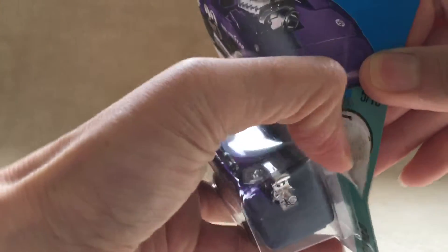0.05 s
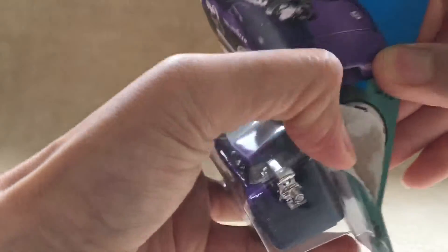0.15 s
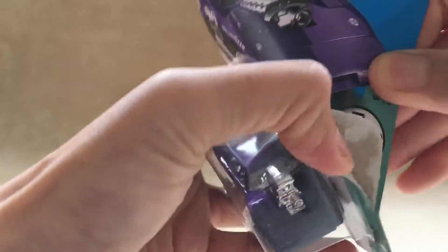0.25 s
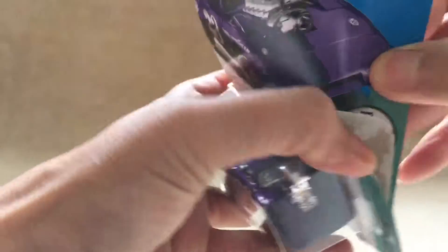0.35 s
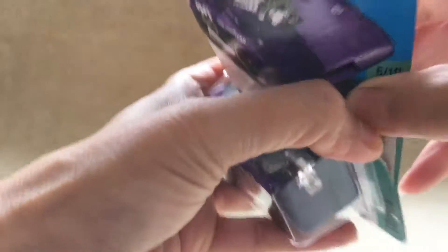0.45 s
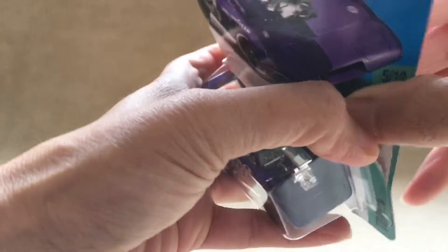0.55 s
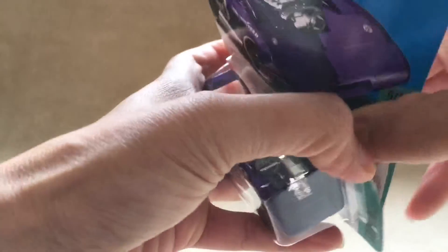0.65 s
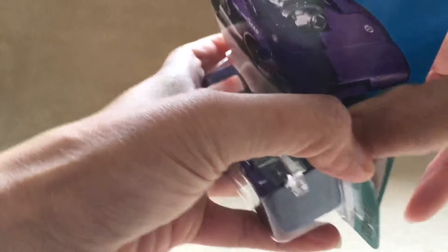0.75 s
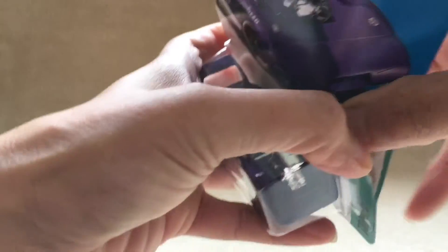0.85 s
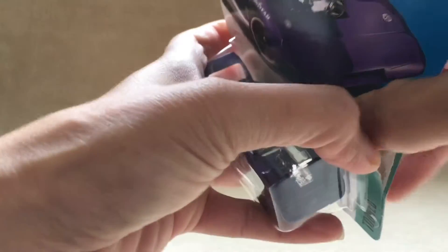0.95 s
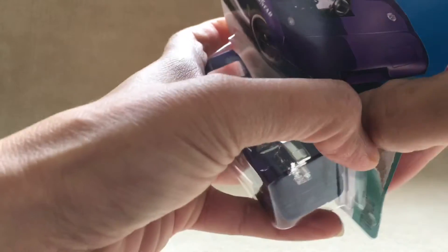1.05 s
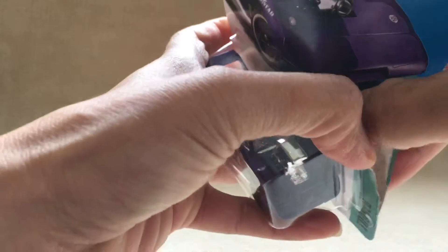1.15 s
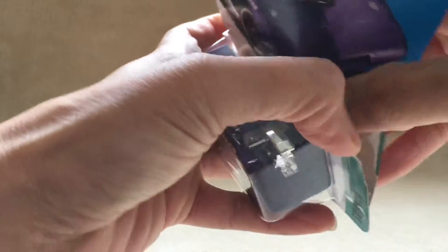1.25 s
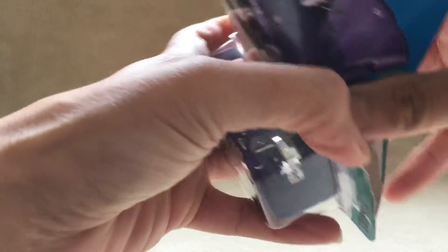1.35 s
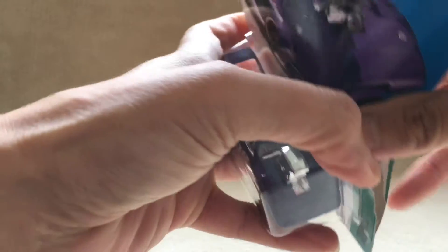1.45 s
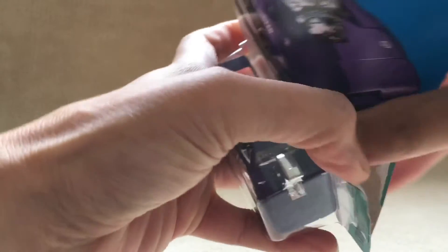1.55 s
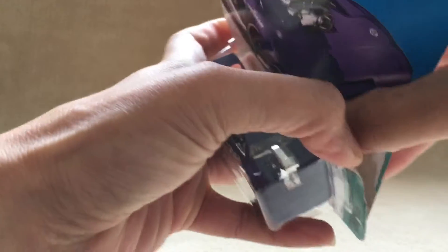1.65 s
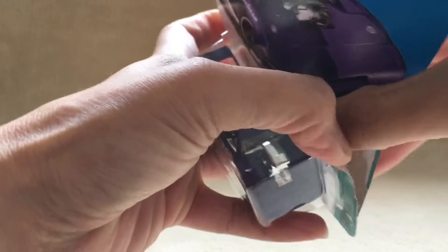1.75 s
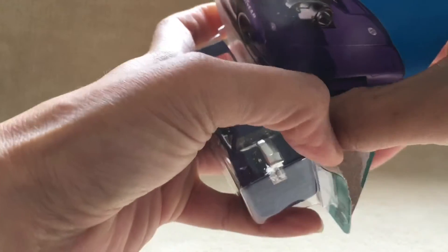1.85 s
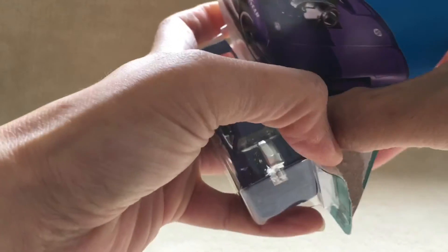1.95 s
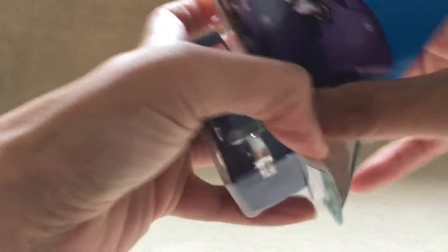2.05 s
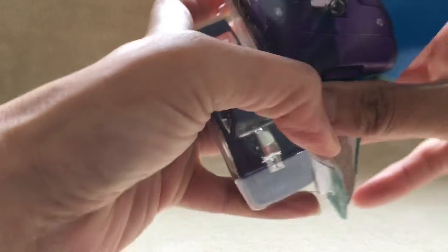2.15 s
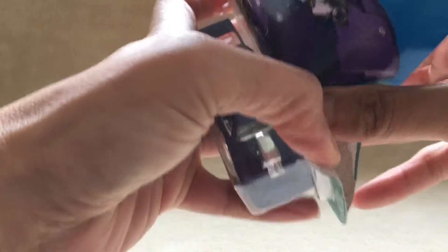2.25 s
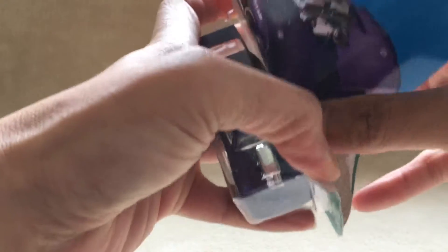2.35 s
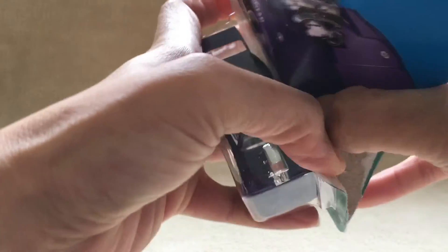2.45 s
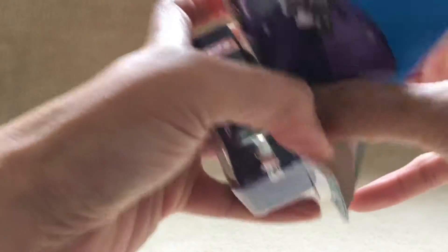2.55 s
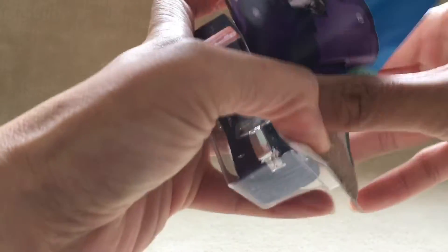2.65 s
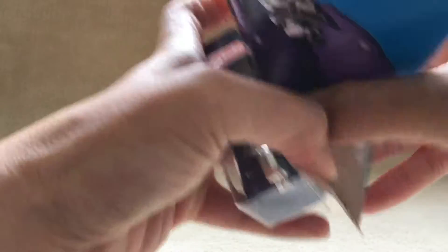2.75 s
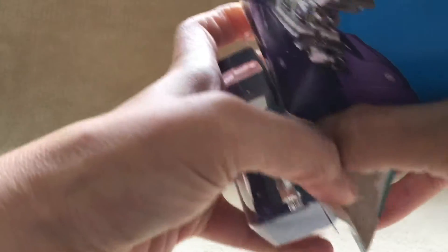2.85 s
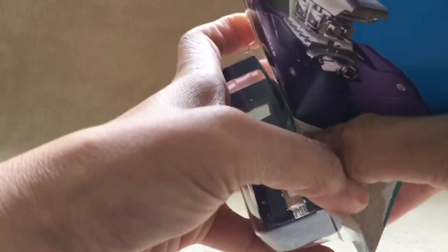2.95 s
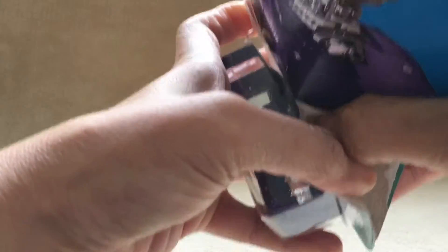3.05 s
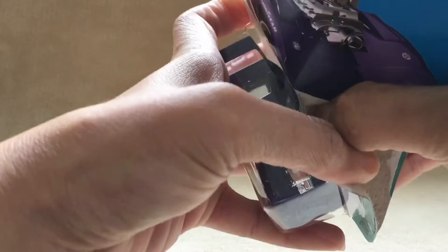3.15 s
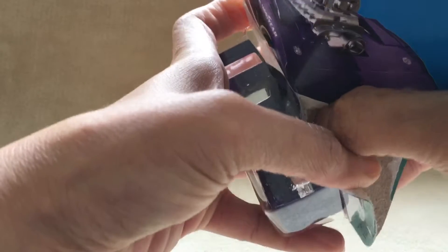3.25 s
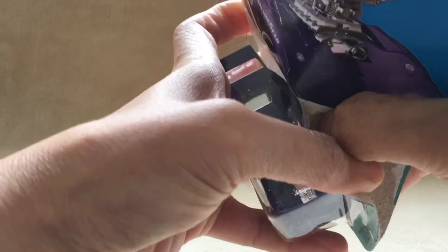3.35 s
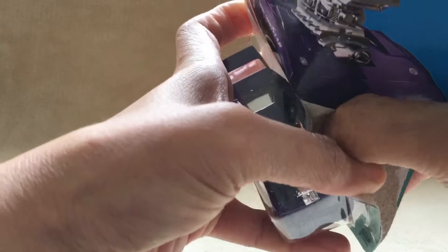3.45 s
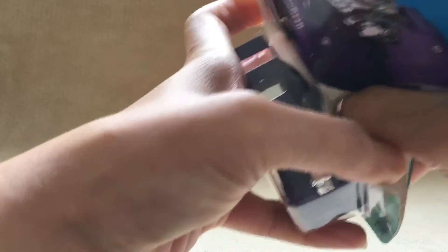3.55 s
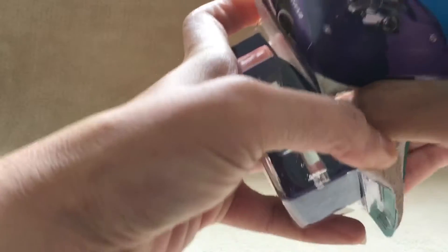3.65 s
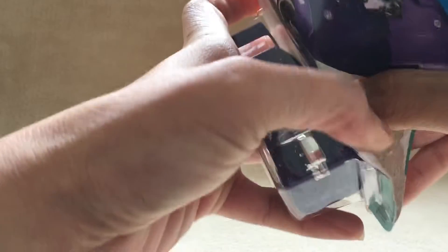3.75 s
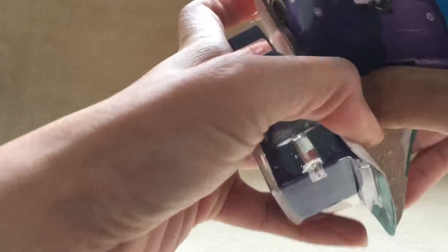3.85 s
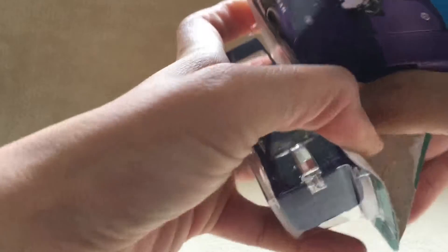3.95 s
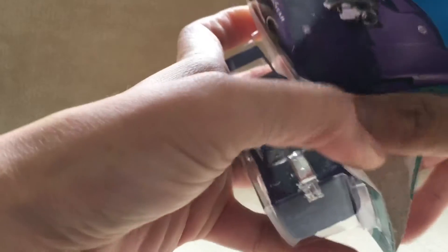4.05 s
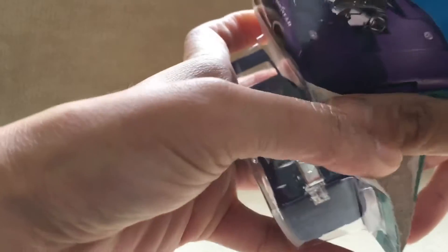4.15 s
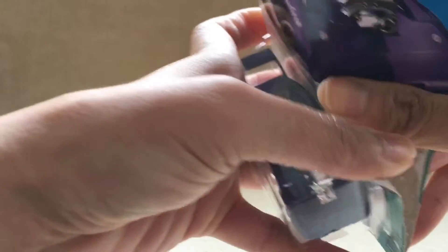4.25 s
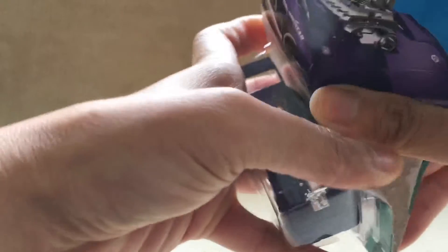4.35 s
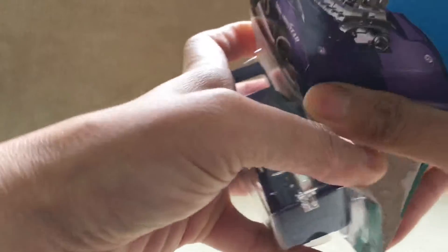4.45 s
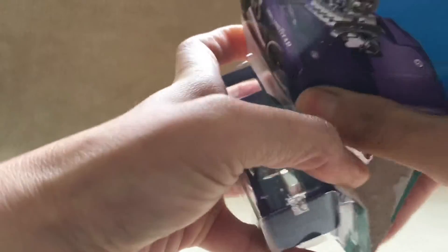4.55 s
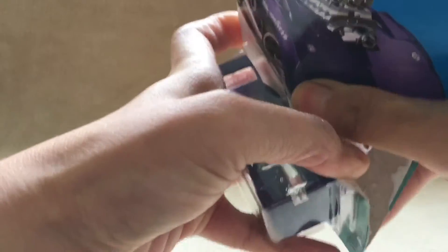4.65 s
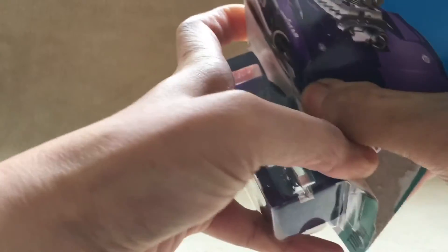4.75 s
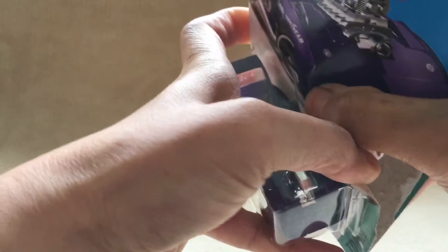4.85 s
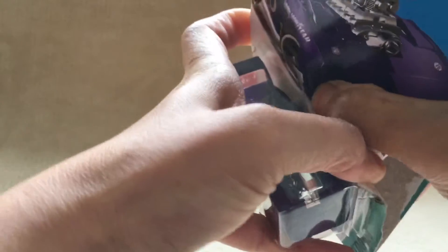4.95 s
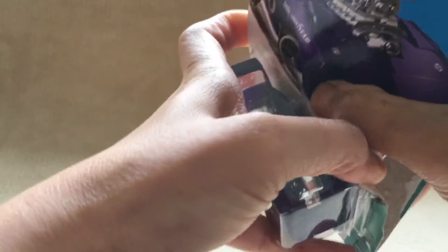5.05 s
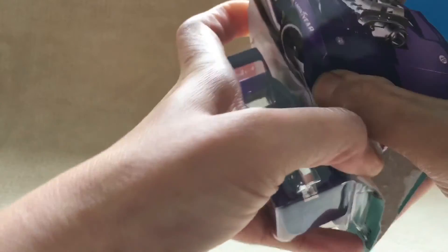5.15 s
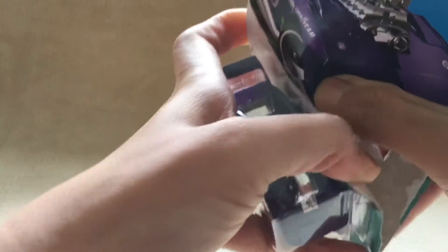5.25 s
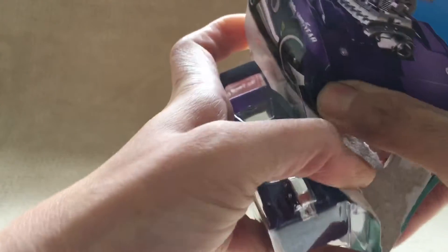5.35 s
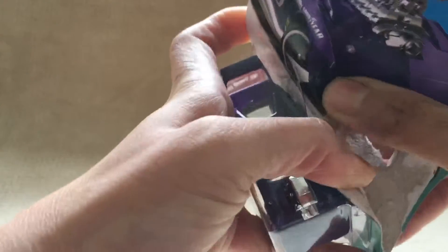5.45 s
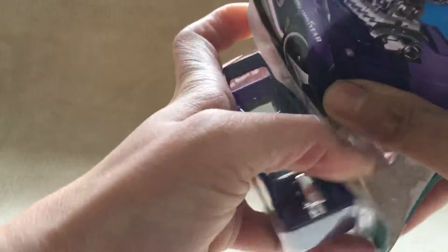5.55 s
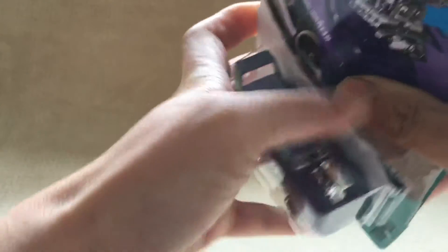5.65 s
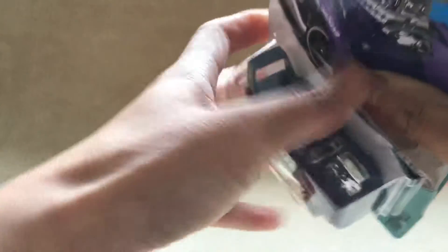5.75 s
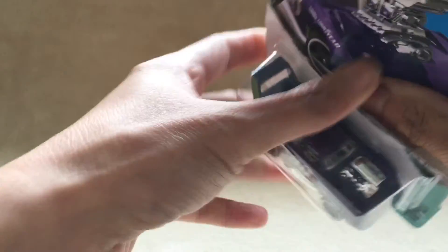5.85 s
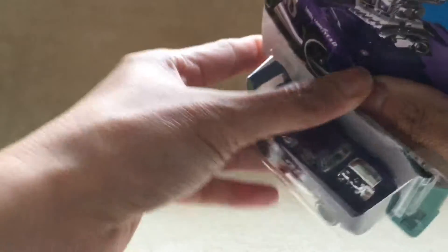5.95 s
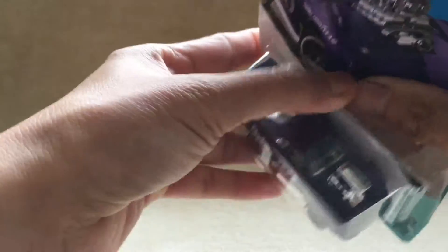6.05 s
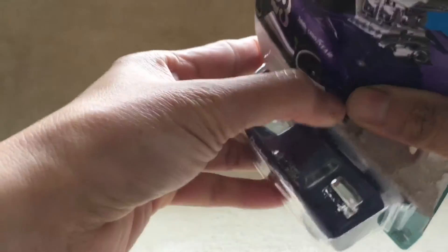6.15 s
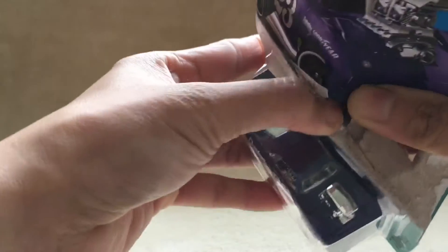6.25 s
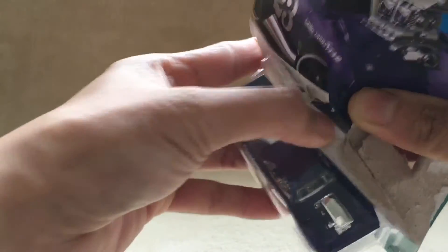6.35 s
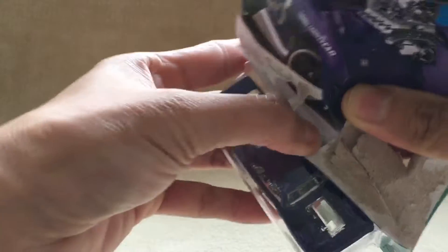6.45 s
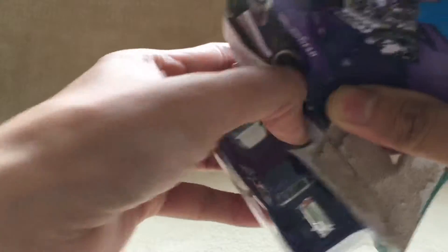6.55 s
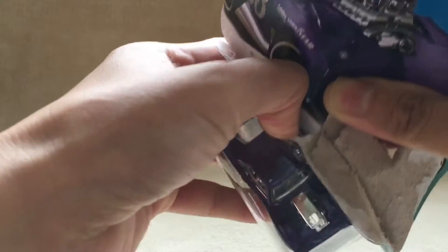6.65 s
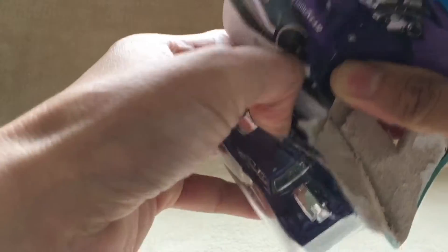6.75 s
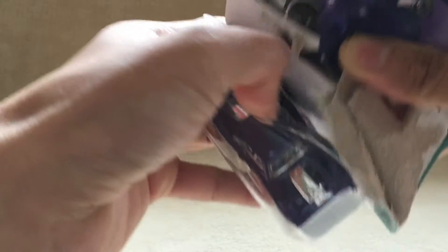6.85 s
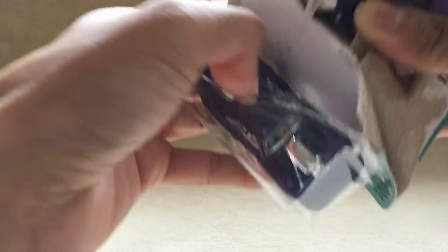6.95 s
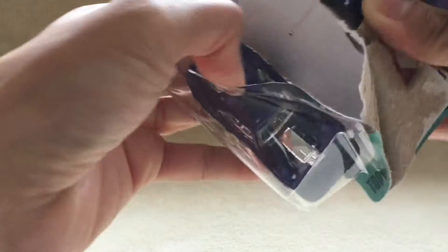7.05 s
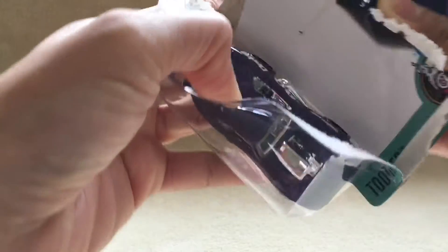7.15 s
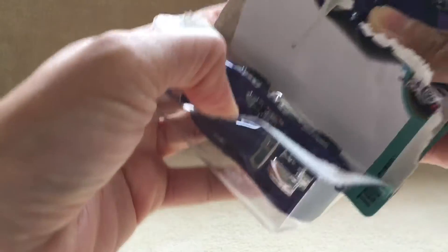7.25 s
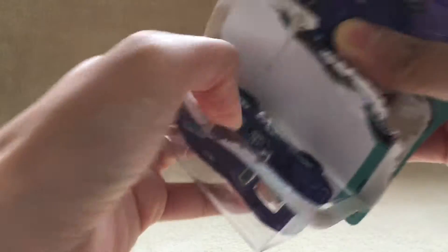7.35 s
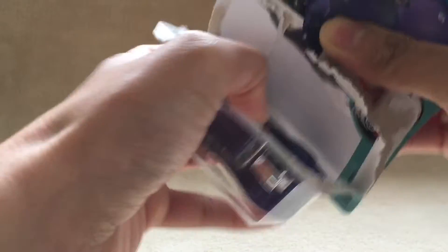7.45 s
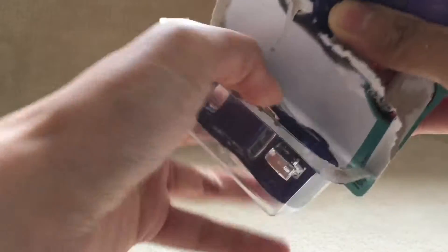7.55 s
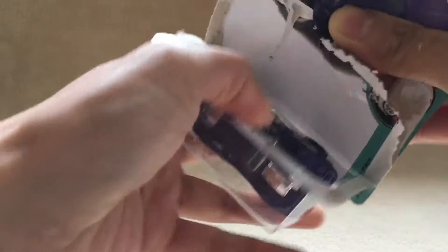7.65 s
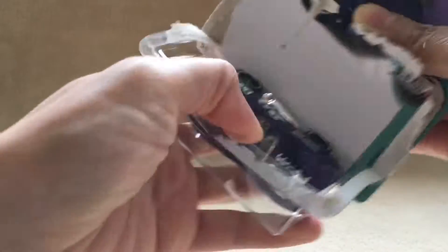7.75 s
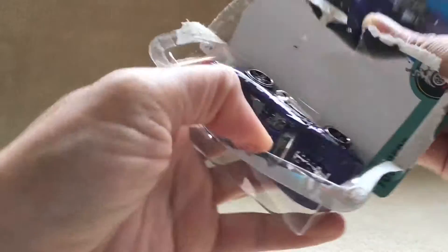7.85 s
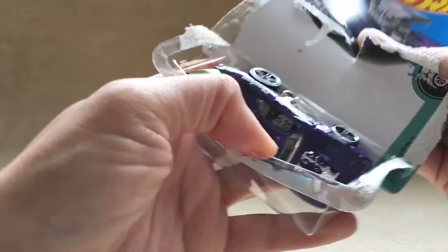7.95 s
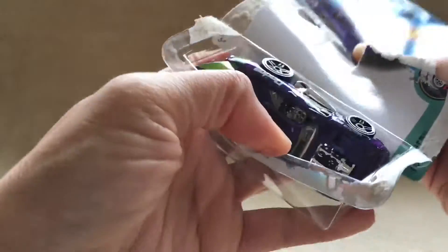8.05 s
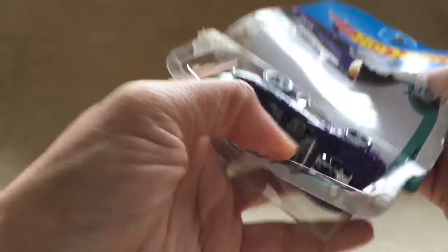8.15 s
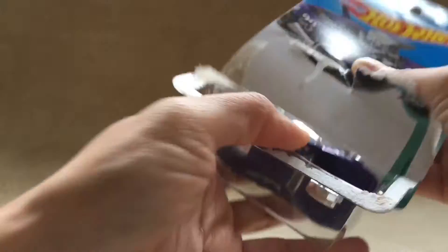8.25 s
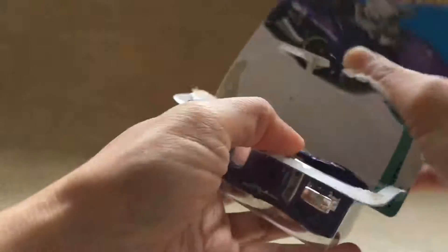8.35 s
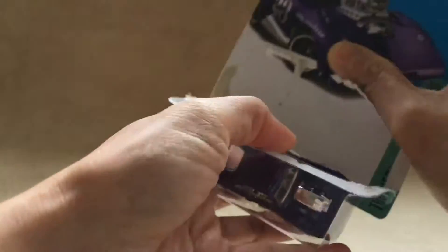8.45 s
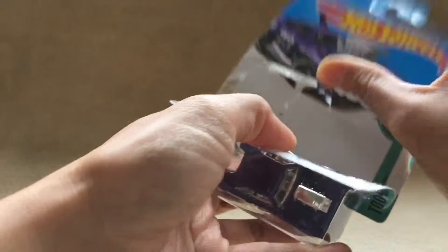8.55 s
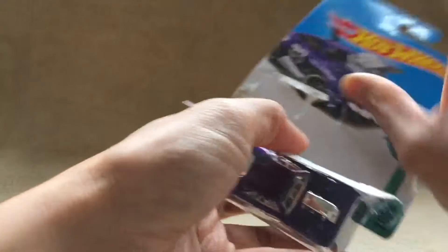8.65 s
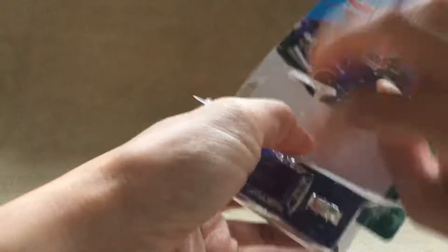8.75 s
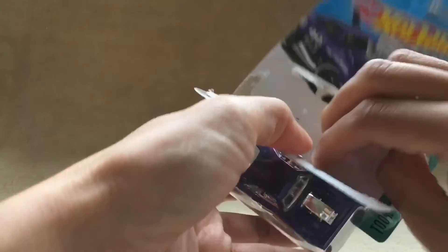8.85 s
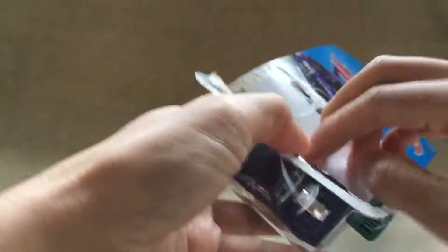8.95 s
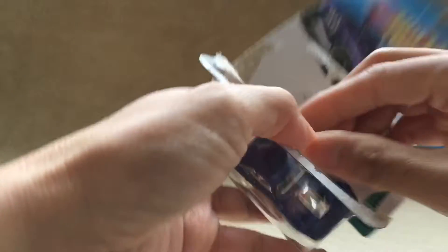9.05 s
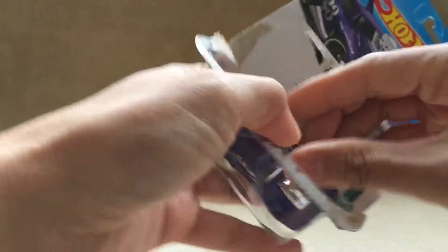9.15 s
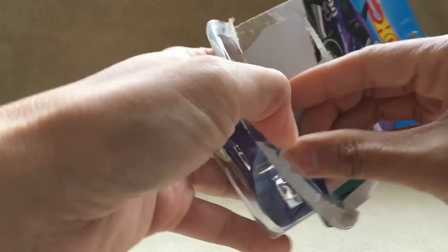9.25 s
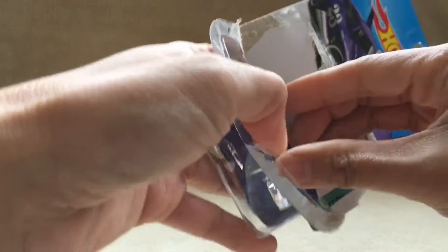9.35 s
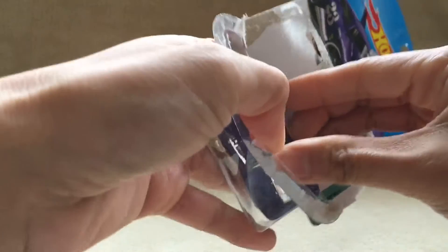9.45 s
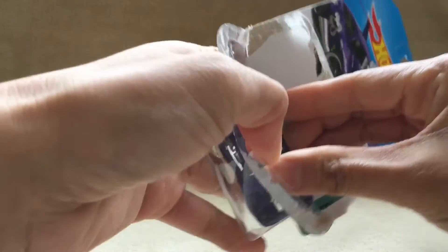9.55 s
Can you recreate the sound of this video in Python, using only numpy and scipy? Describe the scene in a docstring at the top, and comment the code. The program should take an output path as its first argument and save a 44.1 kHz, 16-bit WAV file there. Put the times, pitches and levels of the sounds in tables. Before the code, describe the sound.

Close, dry plastic packaging crackles and pops in uneven tugs, building to loud snaps and ripping card, then easing into lighter crinkles.

```python
"""Indoors, close to a small microphone: two hands peel a clear plastic blister off its cardboard backing.
Glued card tears in a crackle: clumped noise grains over a rasp. The stiff shell buckles in sharp snaps:
uneven slips driving dying sines. Narrow resonances tremble and the hollow shell answers the tearing.
The flapping card pushes air in short low pulses; faint echoes and a low room rumble lie beneath."""
import sys
import numpy as np
from scipy import signal
from scipy.io import wavfile
from scipy.ndimage import uniform_filter1d

SR = 44100
rng = np.random.default_rng(int(sys.argv[2]) if len(sys.argv) > 2 else 0)


def inscribe(sig):
    """Save sig as 16-bit PCM at rate SR to the path in sys.argv[1].

    A 1-D sig is mono; a 2-D sig holds one channel per row.
    Samples are clipped to [-1, 1] before scaling.
    """
    pcm = np.round(np.clip(np.atleast_2d(sig).T, -1, 1) * 32767)
    wavfile.write(sys.argv[1], SR, pcm.astype(np.int16))


N = 423360
TIME_S = np.arange(N) / SR

# shell modes: pitch_factor, relative_db, cycles_to_minus_60_db
SHELL_MODES = [(.56, -11, 18), (.8, -9, 18), (1.0, 0, 27), (1.24, -3, 26), (1.55, -9, 20), (2.1, -13, 20)]
# treble colour of cracks and fibres: freq_hz, relative_db
CRACK_COLOUR = [(2200, -30), (3200, -0.5), (4100, 0.5), (5000, 0), (6200, 0), (8500, -3.5), (10500, -7),
                (12700, -5), (15600, -11)]
# colour of shell and card body: freq_hz, relative_db
BODY_COLOUR = [(120, -5.5), (300, -5.5), (650, 0), (1200, 1), (1800, 4.5), (2400, 3.5), (3300, 0),
               (6000, -17)]
# pulls of the hand, each tearing a strip of glue:
# start_s, length_s, crackle_start_db, crackle_end_db, body_above_crackle_db
PULLS_OF_HAND = [(0.004, 0.2, -55.5, -37, -7.5), (0.402, 0.012, -48, -85, 5.5),
                 (0.445, 0.1, -52.5, -48, 2.5), (0.639, 0.24, -50, -57.5, 3.5),
                 (0.96, 0.35, -48.5, -53, -2.5), (1.164, 0.017, -36, -38.5, -5),
                 (1.356, 0.11, -41, -54.5, 2), (1.569, 0.12, -54, -56, 7.5),
                 (1.685, 0.068, -41.5, -53.5, 1.5), (1.833, 0.19, -46.5, -50.5, -9.5),
                 (1.939, 0.11, -46.5, -43.5, -8.5), (2.142, 0.06, -41, -54.5, 0),
                 (2.226, 0.15, -61, -59.5, 0), (2.496, 0.017, -52, -52.5, 8.5),
                 (2.635, 0.069, -46.5, -42, 0), (2.828, 0.1, -52, -70, 3), (2.956, 0.1, -50, -70, 1.5),
                 (3.096, 0.15, -53, -56.5, -0.5), (3.27, 0.04, -65, -51, 3), (3.408, 0.18, -53, -51, -3),
                 (3.62, 0.027, -30, -58, 4), (3.722, 0.079, -50.5, -54, 8.5), (3.941, 0.12, -53, -44, 4),
                 (4.115, 0.035, -46.5, -45.5, 7.5), (4.319, 0.059, -41, -62, -1),
                 (4.452, 0.028, -50, -54, 7), (4.543, 0.038, -47, -41.5, -1.5),
                 (4.681, 0.14, -55.5, -52, 0), (4.86, 0.083, -59, -60.5, -2),
                 (4.978, 0.033, -40.5, -39.5, -1.5), (5.108, 0.23, -59.5, -55.5, 0),
                 (5.402, 0.11, -51, -51, -4), (5.637, 0.061, -49.5, -44.5, 7), (5.81, 0.25, -61, -67, 8),
                 (5.861, 0.1, -56, -52.5, 9), (6.064, 0.11, -59.5, -57.5, 5), (6.22, 0.14, -54, -52, -3.5),
                 (6.478, 0.0049, -30.5, -41, 1), (6.562, 0.13, -69.5, -57, 3), (6.698, 0.24, -45, -36.5, 0),
                 (6.872, 0.15, -41.5, -39.5, -3), (7.087, 0.12, -51, -38.5, -1),
                 (7.272, 0.19, -72.5, -59, 6), (7.493, 0.17, -48.5, -67, 8.5),
                 (7.79, 0.19, -49, -51.5, 3.5), (8.051, 0.33, -41, -64, -5), (8.37, 0.25, -61, -58, 2.5),
                 (8.658, 0.097, -59.5, -60.5, 0.5), (8.822, 0.15, -40.5, -48.5, -3),
                 (9.063, 0.053, -55, -63, 10), (9.13, 0.03, -44, -49.5, 2.5),
                 (9.252, 0.064, -57.5, -63.5, 13), (9.461, 0.056, -57, -60, -1),
                 (9.576, 0.05, -64, -61, 4.5)]


def gain_of(db):
    """Decibels to an amplitude factor."""
    return 10 ** (np.asarray(db) / 20)


def evened(x):
    """Scales to rms 1."""
    return x / np.sqrt(np.mean(x ** 2) + 1e-20)


def read_spectrum(points, hz):
    """Interpolates a spectrum table on a log-frequency axis."""
    f, value = np.transpose(points)
    return np.interp(np.log(hz + 1), np.log(f + 1), value)


def over_time(points):
    """Interpolates a (time, value) table at every sample."""
    return np.interp(TIME_S, *np.transpose(points))


def add(mix, start_s, sound):
    """Mixes a sound in at a time, cut at the end of the mix."""
    part = mix[round(start_s * SR):][:len(sound)]
    part += sound[:len(part)]


def minimum_phase(colour, size=4096):
    """Minimum-phase impulse response of a colour, floored at -100 dB."""
    hz = abs(np.fft.fftfreq(size, 1 / SR))
    log_gain = np.log(gain_of(np.maximum(read_spectrum(colour, hz), -100)))
    return np.fft.ifft(np.exp(np.conj(signal.hilbert(log_gain)))).real[:size // 2]


def ringing(modes, detune, size=3000):
    """Sum of dying sines, each pitch scaled by its detune factor; modes: hz, db, t60_s."""
    t = np.arange(size) / SR
    return sum(gain_of(db - 60 * t / t60_s) * np.sin(2 * np.pi * hz * factor * t)
               for (hz, db, t60_s), factor in zip(modes, detune))


def shell_modes_at(shell_hz):
    """Shell modes at one pitch; each dies over a set count of cycles."""
    return [(shell_hz * k, db, cycles / (shell_hz * k)) for k, db, cycles in SHELL_MODES]


def burst(x, db):
    """Sets the energy to that of 10 ms of sound at this rms level."""
    return gain_of(db) * x * np.sqrt(SR / 100 / np.sum(x ** 2))


def rumble(level_db=-57, patchy_db=2.4):
    """Room noise, strongest in the bass, its spectrum swelling and sinking in patches."""
    # freq_hz, relative_density_db
    density = [(22, -34), (40, -4.5), (60, 8), (80, -13.5), (120, -4.5), (190, -13), (340, -12),
               (800, -29.5), (2000, -44.5), (16000, -37.5)]
    frames, hz = N // 512 + 5, np.fft.rfftfreq(2048, 1 / SR)
    real, imag, patches = rng.standard_normal((frames, 1025, 3)).T
    patches = evened(uniform_filter1d(uniform_filter1d(patches, 4, 0), 8, 1))
    z = (real + 1j * imag) * gain_of(read_spectrum(density, hz)[:, None] + patchy_db * patches)
    noise = signal.istft(z, nperseg=2048, noverlap=1536)[1][:N]
    return gain_of(level_db) * evened(noise)


def tearing(grains, median_per_s, spread_db, rasp_gain, clump_db):
    """Grains come in clumps, a few large, each with its own colour, over a rasp that swells with the clumps."""
    # separate crackles against smooth scrape: time_s, crackle_share_0_to_1 (before rasp_gain)
    crackle_share = [(1.7, .4), (1.8, .9), (3.5, .85), (3.9, .15), (4.3, .2), (4.6, .85), (5.2, .8),
                     (5.6, .3), (6.3, .8), (7.9, .7), (8.05, .3)]
    slow = uniform_filter1d(uniform_filter1d(rng.standard_normal(N), 400), 250)
    clumps = gain_of(clump_db * evened(slow))
    struck = rng.random(N) < clumps * median_per_s / SR
    size = gain_of(spread_db * np.minimum(rng.exponential(1, N), 3.5)) * struck
    which = rng.integers(0, len(grains), N)
    breaks = sum(signal.oaconvolve(size * (which == k), evened(grain))[:N] for k, grain in enumerate(grains))
    rasp = rasp_gain * evened(clumps * rng.standard_normal(N))
    share = over_time(crackle_share)
    mixed = np.sqrt(share) * evened(breaks) + np.sqrt(1 - share) * rasp
    return mixed / np.sqrt(share + (1 - share) * rasp_gain ** 2)


def drifting(x, patchy_db):
    """Colour wanders as the tear moves over card and shell: bands swell for about a tenth of a second."""
    z = signal.stft(x, nperseg=256)[2]
    patches = uniform_filter1d(rng.standard_normal(z.shape[::-1]).T, 6, 0)
    patches = evened(uniform_filter1d(uniform_filter1d(patches, 30, 1), 20, 1))
    return signal.istft(z * gain_of(patchy_db * patches), nperseg=256)[1][:N]


def pulling(above_db, fall_db_per_s, rise_db_per_s=395):
    """Gain of all pulls: each rises, slides from first to last level, falls; energies add."""
    start_s, length_s, first_db, last_db = np.transpose(PULLS_OF_HAND)[:4, :, None]
    t = np.arange(0, N / SR, .002)
    progress = np.clip((t - start_s) / length_s, 0, 1)
    held_db = first_db + (last_db - first_db) * progress + above_db
    before_s, after_s = np.maximum(start_s - t, 0), np.maximum(t - start_s - length_s, 0)
    db = held_db - rise_db_per_s * before_s - fall_db_per_s * after_s
    return np.interp(TIME_S, t, np.sqrt(np.sum(gain_of(db) ** 2, axis=0)))


def peel():
    """Fibres crackle in the treble; small folds of the shell click and ring through shell and card."""
    fibres = rng.standard_normal((12, 120)) * np.exp(-np.arange(120) / 20.0)  # dying noise bursts
    folds = [ringing(shell_modes_at(hz), rng.uniform(0.773, 1.145, len(SHELL_MODES)))
             for hz in np.geomspace(450, 2400, 14)]
    tear = tearing(fibres, median_per_s=600, spread_db=4.5, rasp_gain=1.3, clump_db=2.8)
    tear = drifting(tear, patchy_db=2.0)
    creak = tearing(folds, median_per_s=220, spread_db=4., rasp_gain=2.6, clump_db=3.)
    creak = drifting(creak, patchy_db=2.4)
    crackle = evened(signal.oaconvolve(tear, minimum_phase(CRACK_COLOUR))[:N])
    body = evened(signal.oaconvolve(0.51 * tear + creak, minimum_phase(BODY_COLOUR))[:N])
    body_above_db = np.transpose(PULLS_OF_HAND)[4, :, None]
    low = pulling(body_above_db, fall_db_per_s=231) * body
    treble = pulling(0, fall_db_per_s=290) * crackle
    return low, treble


def turned(treble, split_hz=10200):
    """The top treble comes and goes, perhaps as the flat sheet turns in the hands."""
    # time_s, top_treble_gain_db
    brightness = [(0.15, 5.5), (0.38, -5), (0.94, 8), (1.11, 2), (2.74, -0.5), (3.37, 14.5), (3.69, -10),
                  (4.84, 2), (5.03, -2), (6.07, -10), (6.282, 7), (6.57, -5), (6.81, 7.5), (7.582, -5.5),
                  (8.04, 6.5), (8.34, -1.5), (9.32, -6.5), (9.59, -0.5)]
    top = signal.oaconvolve(treble, signal.firwin(63, split_hz, pass_zero=False, fs=SR), "same")
    return treble - top + top * gain_of(over_time(brightness))


def hollow(torn):
    """The space between shell and card answers tearing at its resonances, more or less as the gap changes."""
    # resonances of the half-open shell: freq_hz, width_hz
    resonances = [(1200, 290), (3950, 320)]
    # gain of each resonance: time_s, low_db, high_db
    gains = [(0.0, 5, -8), (1.2, -30, -16), (2.0, -2, 7), (2.6, -5, 1), (3.1, 0, 8.5), (3.8, -35, -11),
             (4.4, 4, -4), (5.0, -12, 5), (5.4, 13, -1), (5.9, -3.5, -12), (6.7, 3, -25.5), (7.3, -8.5, -5),
             (7.9, -13, 0), (8.4, -5, -8), (9.0, 4, -2), (9.6, -23, -21)]
    time_s, *gains_db = np.transpose(gains)
    return sum(gain_of(np.interp(TIME_S, time_s, db))
               * signal.lfilter(*signal.iirpeak(hz, hz / width_hz, SR), torn)
               for (hz, width_hz), db in zip(resonances, gains_db))


def room(x):
    """Sparse echoes of random sign, each band dying at its own speed; unit-energy response."""
    # freq_hz, t60_s
    decay = [(200, 0.29), (1400, 0.31), (4000, 0.3), (12000, 0.22)]
    taps = np.zeros(SR // 2)
    at = np.arange(200, SR // 2 - 20, 20)
    taps[at + rng.integers(0, 20, len(at))] = rng.choice([-1., 1.], len(at))
    hz, t, z = signal.stft(taps, SR, nperseg=256)
    fade_db = -60 * t / read_spectrum(decay, hz)[:, None]
    tail = signal.istft(z * gain_of(fade_db), SR, nperseg=256)[1]
    return signal.fftconvolve(x, tail / np.linalg.norm(tail))[:N]


def snap(ring_db, shell_hz, crack_db, knock_db, slip_ms, chance, crack,
         scatter_ms=1.0, detune=0.086, rough_db=-3.5):
    """A fold lets go in uneven slips that ring the shell, crack in the treble and knock the card."""
    # card modes: freq_hz, relative_db (before differencing), t60_s
    card_modes = [(165.7, -21.5, 0.0088), (255, 14.5, 0.041), (309.2, 15, 0.061), (424, -11.5, 0.0081)]
    t_ms = np.arange(1000) / SR * 1000
    attack = np.minimum(t_ms / (0.014 + 0.057 * slip_ms), 1)
    shape = attack * np.exp(-(t_ms / (0.11 + 1.71 * slip_ms)) ** 2)
    noise = chance[1000:2000]
    slips = shape * chance[:1000] * abs(noise) ** 0.38
    factors = 1 + detune * chance[2000:]
    factors[2] = 1  # the main shell mode keeps its pitch
    ring = signal.fftconvolve(slips, ringing(shell_modes_at(shell_hz), factors))
    # sound scatters in the thin sheet for a moment after each slip
    energy = signal.lfilter([1], [1, -np.exp(-1000 / (scatter_ms * SR))], shape ** 2)
    scatter = np.sqrt(abs(energy)) * noise
    # a small panel radiates little far below or above its pitch
    panel = signal.butter(2, [0.51 * shell_hz, 2.02 * shell_hz], "band", fs=SR, output="sos")
    knock = signal.fftconvolve(shape, np.diff(ringing(card_modes, factors[6:]), prepend=0))
    low = burst(signal.sosfilt(panel, ring), ring_db)
    low += burst(knock, knock_db)
    add(low, 0, burst(signal.sosfilt(panel, scatter), ring_db + rough_db))
    return low, burst(signal.fftconvolve(slips + 0.071 * scatter, crack), crack_db)


def snaps():
    """Every buckling of the shell, as body and treble."""
    # start_s, shell_ring_db, shell_hz, crack_db, card_knock_db, slip_scale_ms
    bucklings = [(0.033, -27, 696, -55, -46, 4.3), (0.472, -35, 930, -65, -44, 5.7),
                 (0.807, -39, 2200, -62, -52, 8.8), (1.1539, -30, 743, -34, -39.5, 2.6),
                 (1.3502, -38, 2040, -36.5, -41, 0.84), (1.357, -31.5, 614, -43, -26.5, 2.7),
                 (1.428, -44.5, 950, -60, -63, 10), (1.998, -45.5, 1660, -56, -65, 3),
                 (2.1408, -60, 3000, -32, -47, 19), (2.1875, -31, 920, -61, -28.5, 1.06),
                 (2.5337, -47, 1150, -44, -37.5, 4.3), (2.7088, -26.5, 1870, -32, -54, 6.1),
                 (2.838, -44, 1100, -66, -52, 5.4), (3.5642, -22.5, 615, -23.5, -26.5, 4.4),
                 (3.5978, -29, 1780, -38, -59, 6), (3.6053, -18.5, 2060, -24, -27, 5.9),
                 (3.7364, -45, 1480, -42.5, -41, 3.7), (4.1495, -33, 2290, -34, -38, 2.3),
                 (4.425, -28.5, 1600, -24.5, -54, 0.65), (4.43, -35.5, 1180, -25, -88, 0.45),
                 (4.4372, -23.5, 1235, -19, -49, 0.36), (4.592, -36, 1230, -33.5, -54, 1.7),
                 (5.003, -56, 1550, -36, -53, 4.2), (5.462, -23, 1155, -28.5, -66, 1.8),
                 (5.612, -38, 566, -38, -59, 9.6), (5.658, -40, 1620, -56, -47, 2.4),
                 (5.677, -34, 604, -58, -34.5, 1.9), (5.699, -20, 1770, -32, -35.5, 0.9),
                 (5.8342, -34.5, 960, -68, -33.5, 1.4), (5.88, -45.5, 544, -62, -42, 2.7),
                 (6.0672, -25.5, 710, -43.5, -31.5, 4.1), (6.0776, -25, 632, -53, -36, 0.78),
                 (6.1646, -35, 1210, -33.5, -38, 1.4), (6.3705, -39.5, 1670, -44, -56.5, 4.8),
                 (6.4389, -14, 1325, -20, -34.5, 2.3), (6.4616, -15, 1303, -17, -23, 2.1),
                 (6.6866, -34, 1000, -42, -35, 1.6), (6.6971, -19, 1187, -28.5, -59, 1.34),
                 (6.772, -29.5, 1800, -30, -54.5, 5.7), (6.782, -26.5, 1230, -27, -49, 3.7),
                 (6.879, -31, 2050, -39.5, -50, 7.6), (6.8927, -13.5, 1540, -44, -21.5, 1),
                 (6.9044, -34, 1357, -47, -53, 1.5), (6.9642, -15, 1570, -23, -41, 4.2),
                 (6.977, -33.5, 1370, -38, -45, 0.75), (7.0145, -36, 1860, -48, -44, 8.6),
                 (7.0296, -44, 1950, -37, -57, 1.6), (7.099, -39, 690, -38, -40, 2),
                 (7.1805, -17, 1730, -25.5, -30, 8.1), (7.186, -13.5, 2070, -19.5, -27, 2.2),
                 (7.2087, -46.5, 1680, -46.5, -51.5, 12), (7.436, -24.5, 920, -34, -39, 2.8),
                 (7.4824, -36, 1000, -43, -63, 8.4), (7.4963, -28, 627, -46, -31.5, 0.32),
                 (7.515, -37, 1920, -44, -64, 4), (7.863, -35, 1110, -46, -47, 9.5),
                 (7.9123, -15, 1220, -29.5, -44, 0.53), (8.036, -38.5, 547, -59, -33.5, 0.5),
                 (8.1297, -38, 3500, -67, -77, 0.66), (8.2961, -33, 1900, -58, -42, 0.93),
                 (8.3354, -21, 1860, -29.5, -65, 0.43), (8.344, -32.5, 676, -54, -65, 1.7),
                 (8.371, -35, 2250, -41, -61, 0.6), (8.5788, -42.5, 1730, -48.5, -35.5, 3.7),
                 (8.8538, -40.5, 724, -40.5, -62, 2.6), (8.9008, -42, 1150, -60, -48, 7),
                 (9.1558, -45, 1400, -47, -49, 3.4), (9.1784, -40.5, 1690, -48, -52, 3),
                 (9.2494, -39.5, 604, -66, -40, 1.6), (9.277, -36.5, 1190, -47, -46, 4.1),
                 (9.334, -22.5, 1775, -36.5, -56, 1.8)]
    low, treble, crack = np.zeros(N), np.zeros(N), minimum_phase(CRACK_COLOUR)
    for (start_s, *row), chance in zip(bucklings, rng.standard_normal((len(bucklings), 2010))):
        ring, cracked = snap(*row, chance, crack)
        add(low, start_s, ring)
        add(treble, start_s, cracked)
    return low, treble


def trembles(rattle_power=1.6):
    """A panel trembles on after a snap or under a rubbing finger: rattling knocks feed one resonance."""
    # start_s, length_s, start_level_db, pitch_hz, width_hz (each of two filter passes), fade_db
    panels = [(0.033, 0.041, -34.5, 339, 40, -13), (1.064, 0.082, -45, 3820, 700, -7),
              (7.503, 0.13, -42, 595, 80, -16), (7.925, 0.096, -40, 1380, 278.5, -14),
              (8.334, 0.0037, -18, 6300, 890, -11), (9.044, 0.065, -46.5, 1290, 503, 3),
              (9.336, 0.0097, -14, 2290, 298, -39), (9.35, 0.07, -49, 1780, 201, -12)]
    out = np.zeros(N)
    for row, chance in zip(panels, rng.standard_normal((len(panels), 2, 8000))):
        start_s, length_s, db, hz, width_hz, fade_db = row
        progress = np.arange(round(length_s * SR)) / (length_s * SR)
        peak = signal.iirpeak(hz, hz / width_hz, SR)
        knocks = chance[0] * abs(chance[1]) ** rattle_power
        rung = signal.lfilter(*peak, signal.lfilter(*peak, knocks))[-len(progress):]
        edges = np.minimum(10 * np.minimum(progress, 1 - progress), 1)
        add(out, start_s, gain_of(db + fade_db * progress) * edges * evened(rung))
    return out


def ticks(body_db=-7.5):
    """Single fibres and glue spots let go, some loud, some faint, each a sharp break with a short flutter."""
    # start_s, treble_level_db
    releases = [(0.6368, -42), (1.28, -50), (1.794, -53), (1.849, -37), (1.89, -51), (1.924, -61),
                (1.9654, -49), (1.976, -43), (2.033, -48), (2.0396, -45), (2.052, -48), (2.06, -43),
                (2.12, -50), (2.9835, -50), (3.0337, -52), (3.306, -53.5), (3.337, -56), (3.3622, -49),
                (3.4322, -43), (3.451, -48), (3.5517, -43), (4.0696, -46), (4.5113, -44.5), (4.5545, -45),
                (4.576, -44), (4.7462, -40), (4.917, -60), (4.948, -50), (4.9587, -41), (4.9678, -38.5),
                (4.975, -45), (4.984, -42), (4.9921, -46), (5.009, -41), (5.031, -50), (5.038, -42),
                (5.108, -50), (5.115, -53), (5.273, -54), (6.253, -45), (6.2895, -41), (6.3893, -52),
                (6.478, -34), (7.527, -51), (7.555, -40.5), (7.781, -46), (7.8225, -43), (7.8541, -37.5),
                (8.345, -54), (8.351, -46), (8.365, -45), (9.1296, -44), (9.297, -54), (9.452, -51)]
    low, treble = np.zeros(N), np.zeros(N)
    crack, body = minimum_phase(CRACK_COLOUR), minimum_phase(BODY_COLOUR)
    for (start_s, db), chance in zip(releases, rng.standard_normal((len(releases), 120))):
        flutter = chance * np.exp(-np.arange(120) / 18.)
        add(treble, start_s, burst(signal.fftconvolve(flutter, crack), db))
        add(low, start_s, burst(signal.fftconvolve(flutter, body), db + body_db))
    return low, treble


def flaps():
    """The flapping card pushes and pulls air: a slow sine under a bell-shaped envelope."""
    # centre_s, envelope_peak_db, pitch_hz, width_s (at half amplitude)
    puffs = [(1.172, -34, 65, 0.0059), (1.361, -26, 84, 0.0062), (1.688, -34, 77, 0.0075),
             (2.148, -36, 81, 0.013), (2.739, -37.5, 66.5, 0.0099), (3.572, -32, 104, 0.025),
             (3.632, -25.5, 61, 0.031), (5.89, -33, 85, 0.0048), (6.47, -16.5, 88, 0.0066),
             (6.675, -31, 72, 0.013), (7.193, -13, 87.5, 0.0023), (8.593, -35, 95, 0.02),
             (8.864, -36, 88, 0.0046), (8.916, -35.5, 93, 0.0074)]
    out = np.zeros(N)
    for centre_s, db, hz, width_s in puffs:
        t = np.arange(-1.5 * width_s, 1.5 * width_s, 1 / SR)
        envelope = gain_of(db) * np.exp(-2.8 * (t / width_s) ** 2)
        add(out, centre_s + t[0], envelope * np.sin(2 * np.pi * (hz * t + rng.random())))
    return out


def scene(echo_db=-21):
    """The pack, its echoes, the pushed air and the room."""
    buckled = np.array(snaps())
    torn = np.sum([ticks(), peel()], axis=0)
    low, treble = buckled + torn
    pack = low + trembles() + turned(treble) + hollow(torn.sum(0))
    return (pack + gain_of(echo_db) * room(pack) + flaps() + rumble())[None]


def record(dry, bass_cut_hz=45, knee=.8, edge_hz=16000):
    """The microphone drops the deepest bass, peaks round off from the knee to full scale; then a band limit."""
    dry = signal.sosfilt(signal.butter(2, bass_cut_hz, "high", fs=SR, output="sos"), dry)
    over = np.maximum(abs(dry) - knee, 0)
    held = np.sign(dry) * (np.minimum(abs(dry), knee) + (1 - knee) * np.tanh(over / (1 - knee)))
    lowpass = signal.firwin(511, edge_hz, window=("kaiser", 9), fs=SR)
    return signal.oaconvolve(held, lowpass[None], "same")


dry = scene()
out = record(dry)
inscribe(out)
```